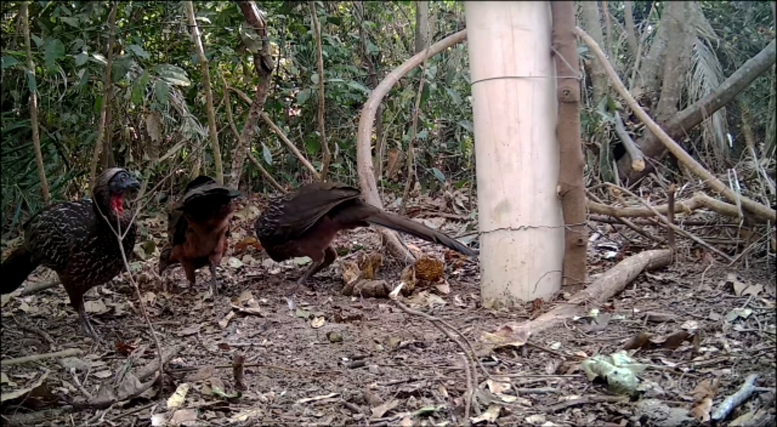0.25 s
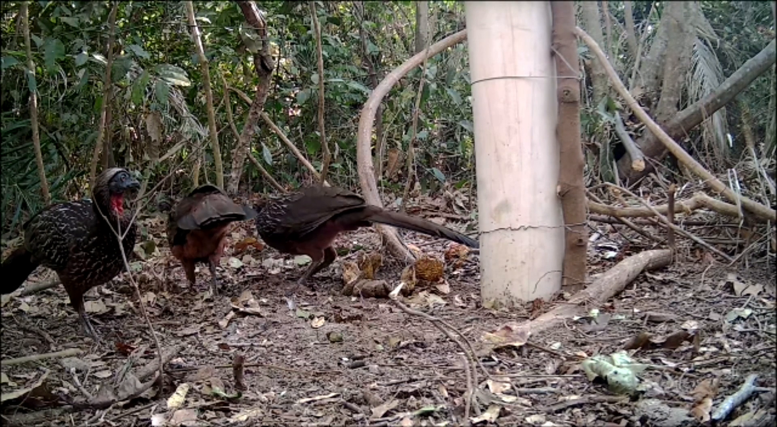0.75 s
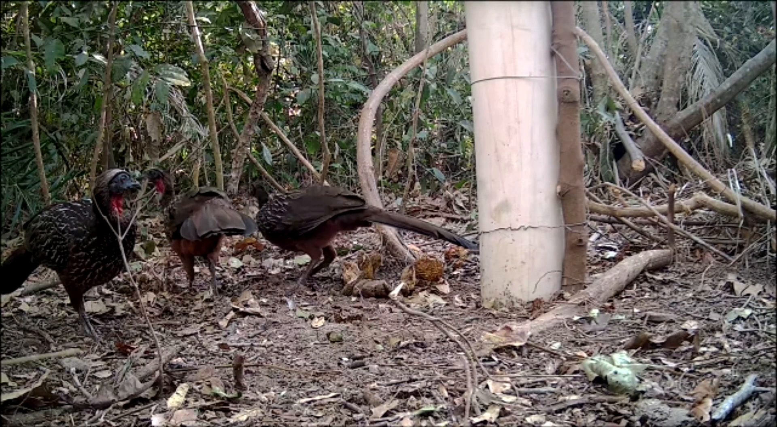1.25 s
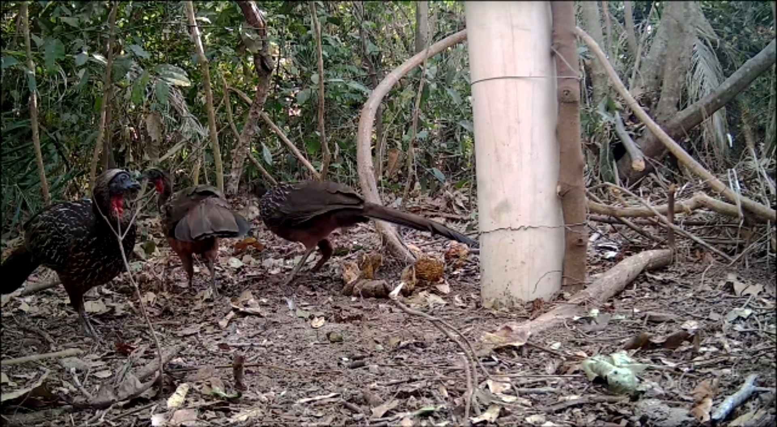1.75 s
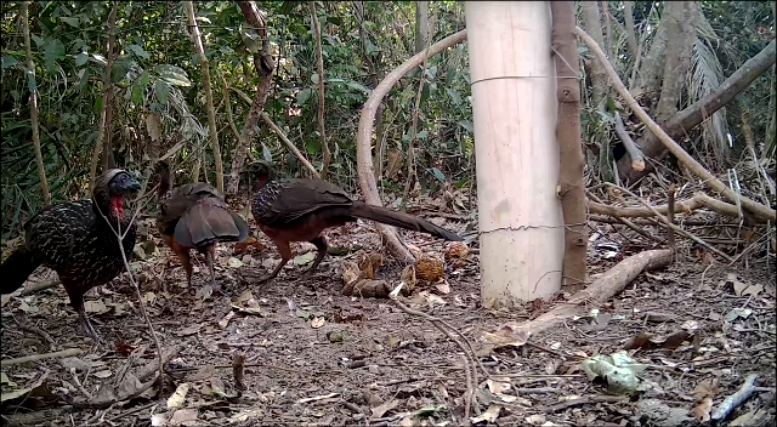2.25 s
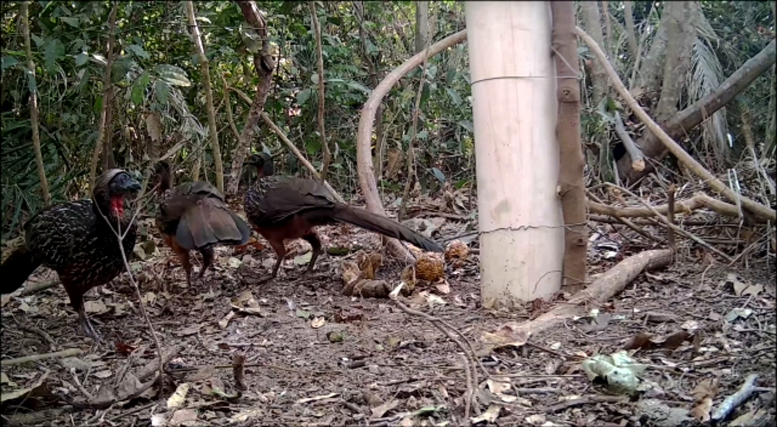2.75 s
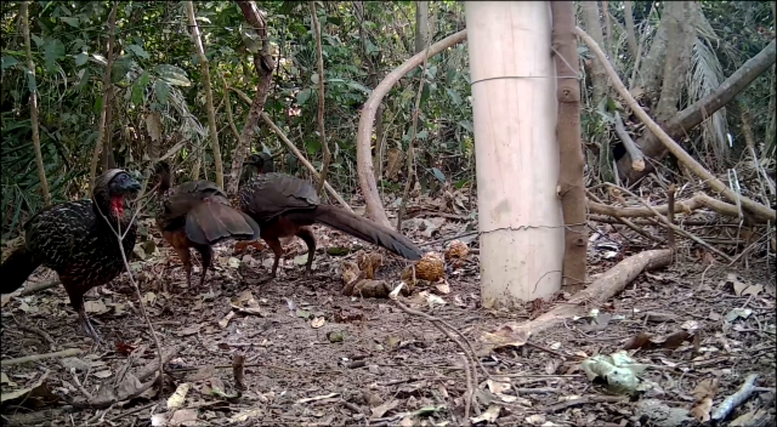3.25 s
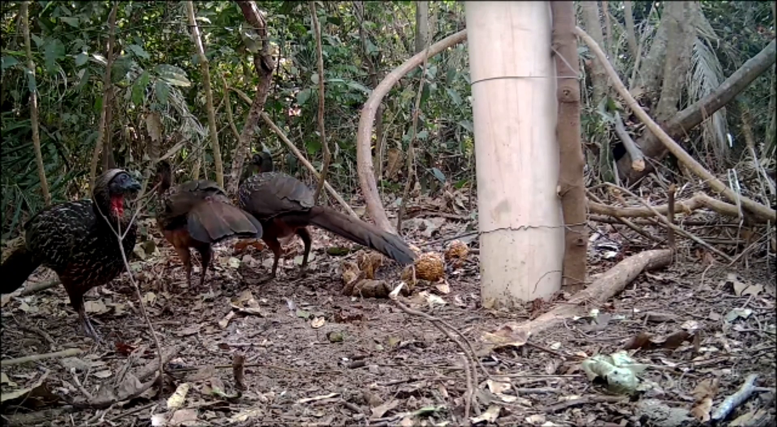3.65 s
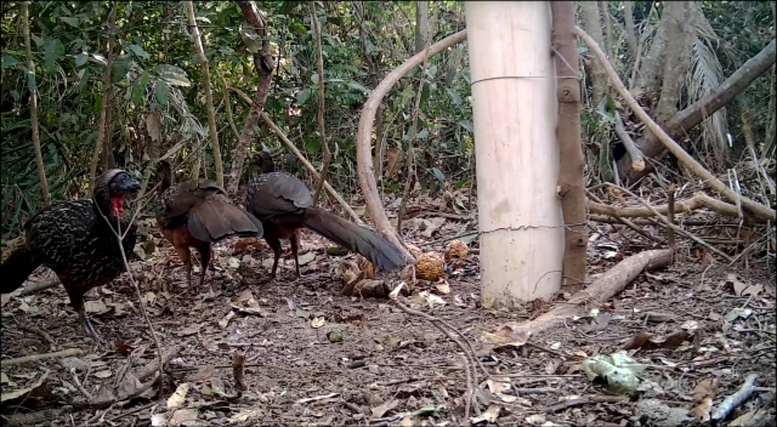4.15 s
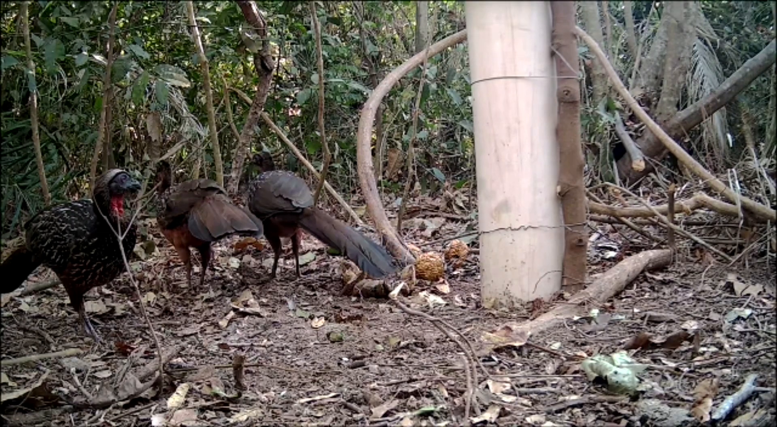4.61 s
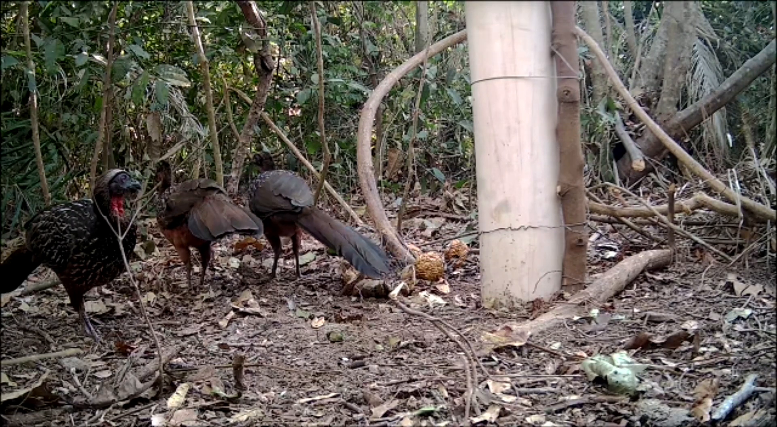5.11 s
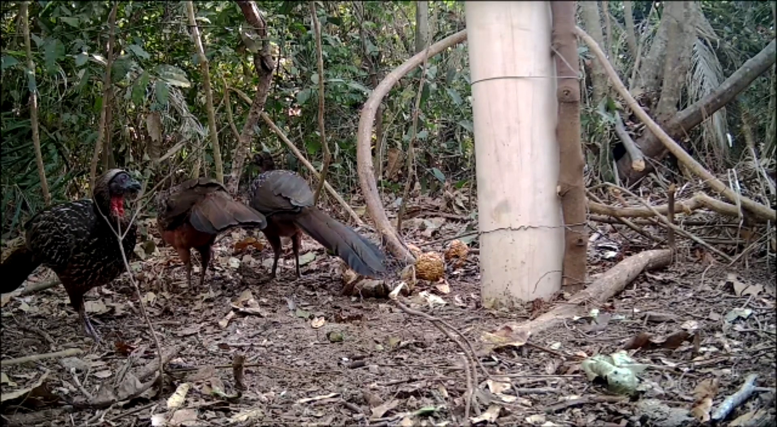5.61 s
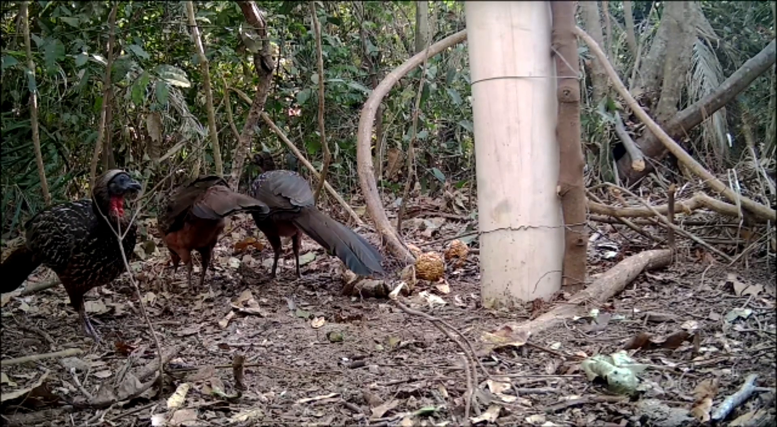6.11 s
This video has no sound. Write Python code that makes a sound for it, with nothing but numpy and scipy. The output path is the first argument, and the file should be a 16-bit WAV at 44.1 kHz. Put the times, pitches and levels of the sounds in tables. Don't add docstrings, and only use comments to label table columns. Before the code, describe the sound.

Outdoors in woodland, a rough burst of cicadas is abruptly cut, leaving a short gap, then a steady bright chorus of crickets and katydids swells in quickly. Near trills pulse in bouts over a blurred distant crowd, with irregular short whistles above and raspy buzzes. Close leaf litter crackles now and then, a faint thin bird whistle passes midway, and a loud broad twig snap comes near the end.

```python
import sys
import numpy as np
from scipy import signal
from scipy.fft import rfft, irfft, next_fast_len
from scipy.io import wavfile
from scipy.ndimage import uniform_filter1d, map_coordinates

SR = 44100
rng = np.random.default_rng(int(sys.argv[2]) if len(sys.argv) > 2 else 0)


def natural_amplitude(level_db):
    exponent = np.asarray(level_db, float) / 20
    return 10 ** exponent


def bounce(signal):
    frames = np.transpose(np.atleast_2d(signal))
    limited = np.clip(frames, -1, 1)
    pcm = np.round(limited * 32767).astype(np.int16)
    wavfile.write(sys.argv[1], SR, pcm)


N = 280917
T = np.arange(N) / SR


def unit(x):
    return x / np.sqrt(np.mean(x ** 2) + 1e-20)


def curves(rows):
    s, *cols = np.transpose(rows)
    return [np.interp(T, s, c) for c in cols]


def wobble(knots_per_s):
    knots = rng.standard_normal(int(N * knots_per_s / SR) + 4)
    return map_coordinates(knots, [T * knots_per_s])


def sine(hz):
    return np.sin(2 * np.pi * np.cumsum(hz) / SR)


def coloured(x, points):
    m = next_fast_len(N + 8192)
    hz, db = np.transpose(points)
    log_hz = np.log(np.fft.rfftfreq(m, 1 / SR) + 1)
    gain = natural_amplitude(np.interp(log_hz, np.log(hz + 1), db, left=-120, right=-120))
    return unit(irfft(rfft(x, m) * gain, m)[:N])


def noise(points):
    return coloured(rng.standard_normal(N), points)


def trees(x, t60_s, wet_db):
    t = T[:SR // 3]
    tail = rng.standard_normal(len(t)) * natural_amplitude(-60 * t / t60_s) * (1 - np.exp(-t / 0.007))
    return x + natural_amplitude(wet_db) * signal.fftconvolve(x, tail / np.linalg.norm(tail))[:N]


def gate(start_s, length_s, edge_s):
    inside_s = np.minimum(T - start_s, start_s + length_s - T)
    return np.clip(inside_s / edge_s + .5, 0, 1)


def beats(rhythm, levels_db):
    first_s, period_s, slowing_s, length_s = rhythm
    return [(first_s + k * period_s + k * k * slowing_s, length_s, db) for k, db in enumerate(levels_db)]


def air():
    # frequency in Hz, density in dB per Hz.
    rumble_colour = [(12, -23), (20, -5.5), (61, -2), (134, -11), (243, -14), (316, -17), (376, -17.5),
                     (533, -21), (1300, -28), (1690, -40), (2860, -120)]
    hiss_colour = [(900, -36), (1300, -15), (1550, 0.5), (1850, -1.5), (2200, -8.5), (3000, -9), (4300, -7),
                   (4900, 3.5), (5400, 0), (5900, 9.5), (6800, -5), (10000, -13), (12500, -14),
                   (14500, -25), (15600, -37)]
    rumble = natural_amplitude(-50.5 + 0.58 * wobble(4.893)) * noise(rumble_colour)
    return rumble + natural_amplitude(-49 + 0.69 * wobble(12)) * noise(hiss_colour)


def mains():
    return natural_amplitude(-58 + 3 * wobble(4.4)) * sine(59 + 2.416 * wobble(4.2))


def engine():
    # time in seconds, level in dB.
    approach = [
        (.3, -82),
        (3.5, -73.5),
        (4.6, -65),
        (5.4, -59.5),
        (6.37, -63),
    ]
    # order of the base rate, level in dB.
    orders = [(2, -5), (3, -6), (4, -7), (6, -6), (7, -2), (8, -1), (9, -8), (10, -7)]
    turn_rad = 2 * np.pi * np.cumsum(42.35 + .35 * wobble(4)) / SR
    hum = sum(natural_amplitude(db + 3.5 * wobble(7)) * np.sin(k * turn_rad) for k, db in orders)
    return natural_amplitude(curves(approach)[0]) * hum


def frogs():
    return sum(natural_amplitude(-75 + 3 * wobble(11)) * sine(hz + 45 * wobble(14)) for hz in (1560, 1680, 1800))


def bird():
    # time in seconds, pitch in Hz, level in dB.
    whistle = [(3.82, 9500, -70), (3.9, 10150, -70), (3.97, 11050, -70), (4.02, 11550, -70),
               (4.06, 11800, -67), (4.11, 11850, -68), (4.17, 11600, -70), (4.24, 11450, -72)]
    hz, db = curves(whistle)
    on = (T > whistle[0][0]) & (T < whistle[-1][0])
    tone = on * natural_amplitude(db - 1.5 + 2.5 * wobble(90)) * sine(hz + 170 * wobble(400))
    return trees(tone, t60_s=0.2, wet_db=3)


def leaves():
    # start in seconds, peak in dB, high part in dB, length in seconds.
    crackles = [
        (.032, -47, -25, .0015),
        (0.414, -54.5, -25, 0.017),
        (0.646, -57, -17, 0.024),
        (2.337, -52, -20, .005),
        (2.357, -57, -3, 0.006),
        (3.079, -50.5, -25, 0.0035),
        (3.189, -53, -19, 0.0046),
        (3.458, -65, 6, .005),
        (4.117, -54, -17, 0.024),
    ]
    low = noise([(900, -16), (1500, -1), (3000, -3), (5000, 4), (8000, -17.5), (9500, -15)])
    high = noise([(8000, -20), (10000, -4), (12500, -11), (14500, -19)])
    out = np.zeros(N)
    for s, db, high_db, length_s in crackles:
        age = np.clip(T - s, 0, None) / length_s
        out += natural_amplitude(db) * np.e * age * np.exp(-age) * (low + natural_amplitude(high_db) * high)
    return out


def twigs():
    # start in seconds, peak in dB, lowest Hz, highest Hz.
    snaps = [
        (.0186, -39, 1500, 4000),
        (.0700, -33, 1200, 3600),
        (.0805, -39, 1400, 2800),
        (.6178, -32, 4000, 11000),
        (2.3575, -41, 1800, 4500),
        (2.3578, -42, 10500, 13000),
        (3.085, -44, 3000, 5000),
        (3.4603, -47, 10000, 13000),
        (6.1550, -30, 1200, 6500),
    ]
    out, push = np.zeros(N), np.eye(1, 300)[0]
    for s, db, low_hz, high_hz in snaps:
        band = signal.butter(2, [low_hz, high_hz], "band", fs=SR, output="sos")
        snap = signal.sosfilt(band, push)
        out[round(s * SR):][:len(snap)] += natural_amplitude(db) * snap / np.abs(snap).max()
    return out


def cicadas():
    # frequency in Hz, density in dB per Hz.
    hiss_colour = [(25, -38.5), (60, -13), (300, -15.5), (800, -21.5), (1500, -22), (2200, -14.5),
                   (4250, -20), (4650, -7.5), (5400, -5), (6100, -1), (6600, -10.5), (10300, -20),
                   (11500, -27.5), (15200, -43)]
    clicks = rng.standard_normal(N) * natural_amplitude(1.8 * wobble(300))
    return natural_amplitude(-39) * coloured(clicks, hiss_colour)


def buzz(rows, colour, teeth_hz, edge_s):
    teeth = np.cos(np.pi * (teeth_hz * T + 0.76 * wobble(15))) ** 2
    rasp = coloured((teeth + .35) * rng.standard_normal(N), colour)
    swell = sum(natural_amplitude(db) * gate(s, length_s, edge_s) for s, length_s, db in rows)
    return trees(swell * natural_amplitude(1.2 * wobble(20)) * rasp, t60_s=.14, wet_db=-5)


def katydids():
    # frequency in Hz, level in dB.
    low_colour = [(6800, -30), (7150, -8), (7450, -3), (8000, -5), (8600, -4), (8900, -8), (9200, -22),
                  (9600, -60)]
    high_colour = [(7000, -30), (7250, -3), (8000, -2), (8500, 0), (9100, -4), (9500, -5), (9800, -13),
                   (10050, -30), (10400, -60)]
    # start in seconds, length in seconds, level in dB.
    low_strays = [(.3, .18, -49.5), (.64, .2, -53), (.86, 0.16, -57.5), (1.0, 0.19, -52),
                  (1.32, 0.15, -52.5), (1.63, 0.18, -51), (1.91, 0.2, -53), (2.22, .24, -51.5),
                  (2.48, .07, -57), (2.6, 0.19, -49.5), (2.92, 0.16, -54), (3.09, .24, -53),
                  (3.52, 0.17, -52.5), (3.92, 0.096, -50)]
    high_strays = [(.3, 0.12, -50), (.61, 0.16, -53), (5.68, 0.15, -60), (6.07, 0.21, -50)]
    # (first s, period s, slowing s per buzz squared, length s), then each level in dB.
    low_run = (4.3, .355, -.005, .15), (-53.5, -55, -54, -49.5, -50.5, -50, -48)
    high_run = (3.33, .36, 0, .22), (-50.5, -51.5, -50.5, -49.5, -49, -51)
    far = natural_amplitude(-63.5) * noise(low_colour)
    low = buzz(low_strays + beats(*low_run), low_colour, teeth_hz=154.7, edge_s=0.039)
    high = buzz(high_strays + beats(*high_run), high_colour, teeth_hz=164, edge_s=0.07)
    return far + low + high


def add_note(out, s, length_s, hz, db, edge_s, waver_hz, sink_hz=0):
    t = T[:int((length_s + 2 * edge_s) * SR)]
    shape = np.sin(np.pi / 2 * np.clip(np.minimum(t, t[-1] - t) / (2 * edge_s), 0, 1)) ** 2
    start = int((s - edge_s) * SR)
    pitch_hz = hz + np.resize(waver_hz[start:], len(t)) - sink_hz * (t / t[-1] - .5)
    out[start:][:len(t)] += natural_amplitude(db + 1) * shape * sine(pitch_hz)


def whistlers():
    # pitch in Hz, note-to-note scatter in Hz, waver in Hz, fall in Hz.
    wings = dict(A=(6625, 12, 40, 0), B=(7232, 8, 30, 55), C=(7370, 14, 35, 50), D=(7588, 10, 16, 0),
             E=(7806, 8, 12, 10), F=(7890, 8, 18, 0), G=(6780, 5, 15, 0), H=(7065, 10, 30, 60),
             I=(7950, 8, 18, 0))
    # wing, (first s, period s, slowing s per note squared, length s), each level in dB.
    runs = [
        ("B", (.517, .375, .0013, .031), (-44, -41, -41, -41, -45, -36.5, -38, -37.5, -43)),
        ("B", (1.934, .393, 0, .02), (-38, -36.5, -36, -34.5, -40, -34.5)),
        ("C", (4.587, .386, 0, .032), (-44, -44, -52, -41, -41)),
        ("D", (.334, .274, 0, .082), (-48, -42.5, -46)),
        ("D", (1.968, .558, -.001, .085), (-47, -46, -47, -46.5, -45.5, -45.5, -46)),
        ("E", (2.738, .536, .0011, .097), (-47, -48, -48, -47, -46.5, -47, -48)),
        ("F", (1.55, .519, .0008, .08), (-51.5, -54, -50, -54, -50, -51, -52, -51, -50, -51)),
        ("G", (.645, .353, .0056, .022), (-51, -57, -53, -54, -56, -50, -57, -54, -56, -52)),
        ("H", (.535, .38, 0, .022), (-49, -52, -58, -43, -49, -49)),
        ("H", (3.11, .383, 0, .022), (-52, -52, -51, -51, -48, -52, -55)),
    ]
    # start in seconds, length in seconds, level in dB.
    loose_a = [(0.541, 0.038, -52), (0.72, 0.02, -55), (0.91, 0.028, -46), (1.117, 0.04, -51),
               (1.359, 0.037, -47), (1.622, 0.03, -46), (2.29, 0.07, -55), (2.732, 0.032, -52),
               (3.18, .05, -54), (4.09, .03, -55), (4.96, .06, -55), (5.26, .08, -57), (5.93, .07, -56)]
    loose_b = [(2.69, 0.025, -45), (2.85, .02, -46), (3.263, 0.028, -51)]
    loose_c = [(0.319, 0.02, -43), (0.708, 0.031, -48), (0.825, 0.026, -48), (1.531, 0.025, -41),
               (1.565, .04, -47), (1.924, 0.022, -43), (2.271, 0.05, -47), (2.3, 0.03, -44),
               (2.343, 0.043, -45), (2.766, 0.032, -43), (2.841, 0.024, -44), (3.024, 0.071, -45),
               (3.154, 0.057, -47), (3.232, 0.026, -46), (3.398, 0.082, -48), (3.486, 0.013, -41),
               (3.61, 0.019, -36.5), (3.981, 0.081, -44.5), (4.426, 0.046, -47), (4.837, 0.038, -41),
               (6.16, 0.034, -43)]
    loose_d = [(1.172, .085, -42), (1.43, .082, -46.5), (4.28, .06, -52), (5.86, .085, -46.5)]
    loose_e = [(0.497, 0.216, -49), (0.744, 0.086, -47.5), (1.1, 0.11, -46), (1.313, 0.085, -46),
               (1.66, 0.12, -46), (1.89, 0.08, -46), (2.2, 0.11, -49), (2.47, 0.07, -45)]
    loose_i = [(.5, .2, -53), (1.076, .035, -53), (1.14, .11, -53), (1.68, .12, -52), (2.233, .069, -54),
               (2.78, .09, -51)]
    # start in seconds, length in seconds, pitch in Hz, level in dB.
    strays = [(0.319, 0.05, 8460, -53), (0.349, 0.038, 7420, -42), (0.43, .05, 7540, -48),
              (0.662, 0.051, 8460, -51), (.8, .03, 7420, -48), (.905, .02, 7320, -46),
              (1.12, .05, 7385, -45), (1.177, 0.05, 7440, -50), (2.04, .025, 7310, -46),
              (2.319, 0.022, 7470, -49), (2.64, .03, 7390, -48), (2.7, 0.032, 7480, -49),
              (3.0, .015, 7700, -50), (3.474, 0.04, 7400, -50), (3.54, .025, 7407, -48),
              (3.74, .025, 7558, -49), (3.803, 0.064, 8420, -51), (3.832, .022, 7320, -48),
              (3.869, 0.026, 7470, -44), (3.948, .022, 7400, -48), (4.035, .02, 7200, -48),
              (4.135, 0.081, 8400, -51), (4.14, .04, 7500, -51), (4.212, .03, 7360, -49),
              (4.26, 0.028, 7470, -44), (4.375, .028, 7300, -48), (4.482, 0.074, 8540, -53),
              (4.52, .02, 7500, -51), (4.564, 0.028, 8460, -51), (4.57, 0.02, 7520, -44),
              (4.615, .024, 7300, -47), (4.649, 0.046, 7460, -48), (4.762, .024, 7320, -47),
              (4.86, .03, 7570, -50), (4.961, 0.025, 7550, -42), (5.04, .02, 7470, -48),
              (5.09, .025, 7300, -51), (5.24, .035, 7340, -49), (5.355, .025, 7560, -43),
              (5.378, .024, 7410, -43), (5.436, 0.023, 7440, -47), (5.47, .04, 7300, -50),
              (5.64, .025, 7370, -49), (5.753, 0.025, 7550, -42), (5.77, .02, 7385, -42),
              (6.01, .03, 7640, -50), (6.15, 0.019, 7570, -40)]
    # start in seconds, peak in dB, pitch in Hz.
    double_chirps = [(0.389, -54, 3430), (1.668, -55.5, 3445), (2.530, -55.5, 3460), (3.375, -54.5, 3445),
                     (3.696, -54.5, 3455), (4.840, -53, 3435), (5.390, -54, 3440), (5.723, -54, 3445)]
    lone_chirps = [(.67, -60, 3490), (0.8225, -61, 3560), (1.13, -62, 3590), (1.75, -60, 3540),
                   (1.985, -61, 3540), (3.74, -59, 3600), (4.12, -60, 3530), (4.92, -57, 3480),
                   (4.9591, -56, 3580), (5.0948, -57, 3600)]
    # frequency in Hz, level in dB.
    haze_colour = [(6450, -30), (6600, -2), (6720, -10), (6900, -17), (7100, -8), (7330, 1), (7700, -4),
                   (7950, -7), (8200, -30)]

    out, waver = np.zeros(N + SR), wobble(130)
    songs = [(wing, beats(rhythm, levels_db)) for wing, rhythm, levels_db in runs]
    songs += zip("ABCDEI", (loose_a, loose_b, loose_c, loose_d, loose_e, loose_i))
    for wing, song in songs:
        hz, scatter_hz, rough_hz, fall_hz = wings[wing]
        for s, length_s, db in song:
            note_hz = hz + scatter_hz * rng.standard_normal()
            add_note(out, s, length_s, note_hz, db + .2, edge_s=.007, waver_hz=rough_hz * waver, sink_hz=fall_hz)
    for s, length_s, hz, db in strays:
        add_note(out, s, length_s, hz, db - .7, edge_s=0.009, waver_hz=25 * waver, sink_hz=50)
    pair_gap_s = .055
    seconds = [(s + pair_gap_s, db, hz) for s, db, hz in double_chirps]
    for s, db, hz in double_chirps + seconds + lone_chirps:
        add_note(out, s - .002, .02, hz - 10, db - 5, edge_s=.008, waver_hz=60 * waver, sink_hz=70)
    for when, pitch, size in rng.random((230, 3)):
        add_note(out, .35 + 5.9 * when, .02, 7180 + 400 * pitch, -59 + 6 * size, edge_s=.006,
                 waver_hz=30 * waver, sink_hz=80)
    near = trees(out[:N] * natural_amplitude(1.6 * wobble(70)), t60_s=.12, wet_db=-12)
    return near + natural_amplitude(-55 + 4.2 * wobble(11)) * noise(haze_colour)


def trill(strokes, wing_hz, fall_hz, duty, scatter_db):
    u = (strokes + duty / 2) % 1 / duty
    stroke_number = np.floor(strokes + duty / 2).astype(int)
    size = natural_amplitude(scatter_db * rng.standard_normal(400))[stroke_number % 400]
    pitch_hz = wing_hz - fall_hz * (u - .5) * (u < 1) + 14 * wobble(20)
    return size * np.sin(np.pi * np.clip(u, 0, 1)) ** 1.3 * sine(pitch_hz)


def near_triller():
    # start in seconds, length in seconds, level in dB, lead in strokes.
    bout_rows = [(.3, .09, -43.5, -.1), (.44, .1, -43, .04), (.62, .17, -44, 0), (.87, .19, -38.5, -.06),
                 (1.2, .23, -39.5, .45), (1.52, .08, -39, .42), (1.63, .15, -40.5, .5),
                 (1.87, .1, -39, .48), (2.0, .19, -39, .44), (2.22, .23, -41.5, .38), (2.6, .08, -50, .6),
                 (2.91, .13, -42.5, .75), (3.08, .13, -44, .95), (3.32, .3, -43.5, 1.5),
                 (3.65, .27, -46, 1.55), (3.95, .34, -45, 1.8), (4.43, .11, -41.5, 2.05),
                 (4.71, .27, -41.5, 2.15), (5.0, .31, -41, 2.12), (5.42, .07, -47, 1.55),
                 (5.51, .09, -44, 1.75), (5.67, .12, -47, 1.7), (5.87, .2, -48, 1.6),
                 (6.125, .05, -46, 1.75), (6.25, .07, -46, 1.8)]
    strokes_per_s, rest_db = 44.4, -56
    start, length, _, lead = np.transpose(bout_rows)
    timing = np.interp(T, np.ravel([start, start + length], "F"), np.repeat(lead, 2))
    bouts = natural_amplitude(rest_db) + sum(natural_amplitude(db) * gate(s, length_s, edge_s=.05) for s, length_s, db, _ in bout_rows)
    strokes = strokes_per_s * T + timing + .035 * wobble(25)
    song = trill(strokes, wing_hz=6214, fall_hz=80, duty=.88, scatter_db=1.5)
    return natural_amplitude(-.3) * bouts * unit(trees(song, t60_s=0.06, wet_db=-14))


def far_trillers():
    # wing pitch in Hz, strokes per second, fall in Hz, level in dB.
    singers = [(6088, 45.2, 40, 1.5), (6070, 43.6, 260, -3), (6000, 44.8, 260, -4), (5930, 46.1, 260, -5),
               (5850, 42.7, 260, -7), (5790, 44.1, 160, -11), (6130, 47.3, 200, -6), (6200, 46.7, 120, -6)]
    # time in seconds, level in dB.
    crowd_level = [(0.5, -42.5), (0.76, -43), (0.84, -39.5), (1.28, -43), (2.16, -51), (2.54, -44),
                   (2.72, -47), (2.87, -41.5), (3.15, -43), (3.28, -48.5), (3.5, -40.5), (3.76, -43),
                   (3.9, -40.5), (4.65, -50), (5.14, -50), (5.4, -40.5), (5.64, -45), (5.75, -41.5)]
    crowd = np.zeros(N)
    for hz, strokes_per_s, fall_hz, db in singers:
        strokes = strokes_per_s * T + .5 * wobble(4)
        crowd += natural_amplitude(db + 1.2 * wobble(6)) * trill(strokes, hz, fall_hz, duty=.9, scatter_db=1.2)
    crowd = trees(crowd, t60_s=0.6, wet_db=-3.5)
    crowd = crowd / np.sqrt(np.abs(uniform_filter1d(crowd ** 2, SR // 8)) + 1e-9)
    return natural_amplitude(curves(crowd_level)[0] + 1.35) * crowd


def scene():
    cut_s, back_s, fade_s = .1143, 0.298, 0.03
    background = air() + mains() + engine() + frogs() + bird()
    chorus = background + katydids() + whistlers() + far_trillers() + near_triller()
    fade_in = np.sin(np.pi / 2 * np.clip((T - back_s) / fade_s, 0, 1)) ** 2
    scrap = np.clip((cut_s - T) / 0.0003, 0, 1) * cicadas()
    return (scrap + fade_in * chorus + leaves() + twigs())[None]


def top_cut(x):
    return signal.sosfilt(signal.butter(12, 15530, fs=SR, output="sos"), x)


def record(dry):
    return top_cut(dry)


dry = scene()
out = record(dry)
bounce(out)
```